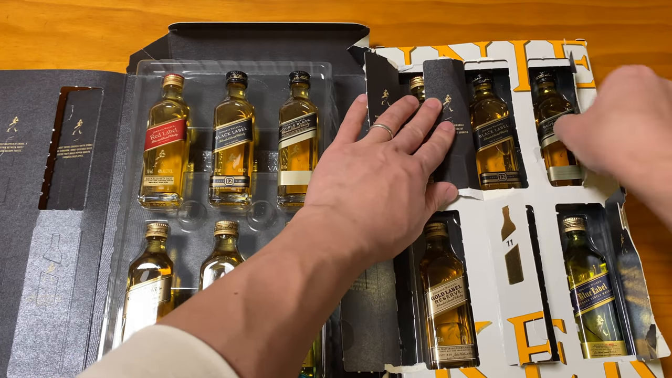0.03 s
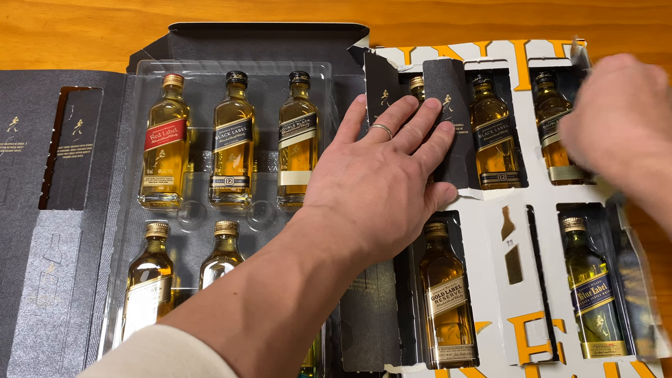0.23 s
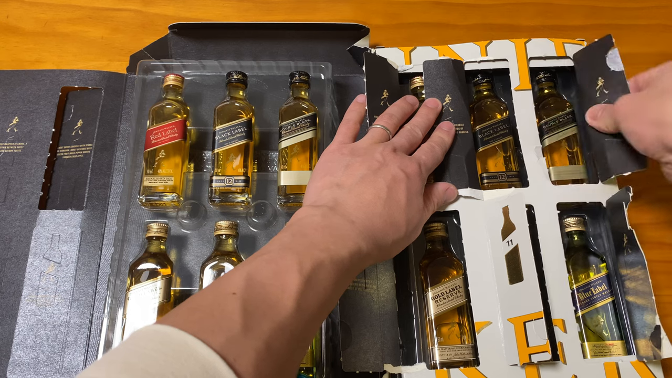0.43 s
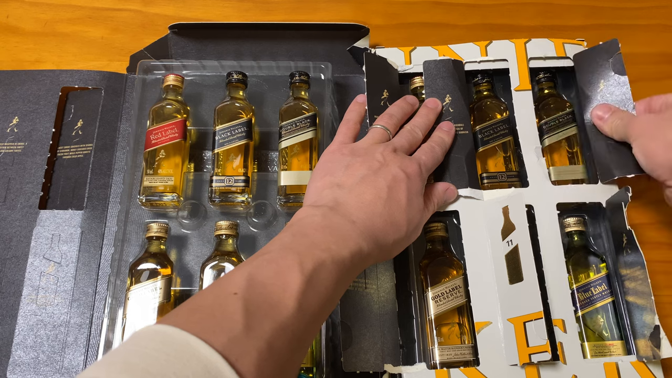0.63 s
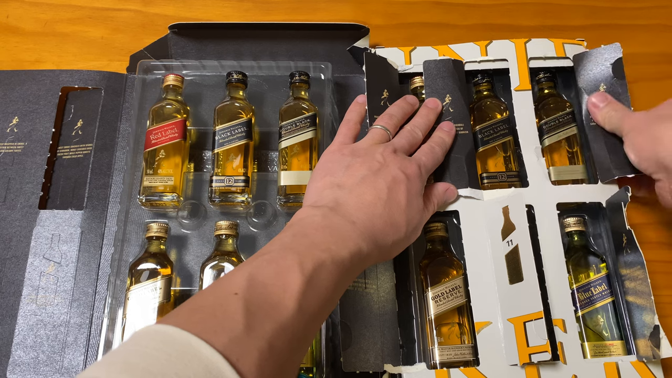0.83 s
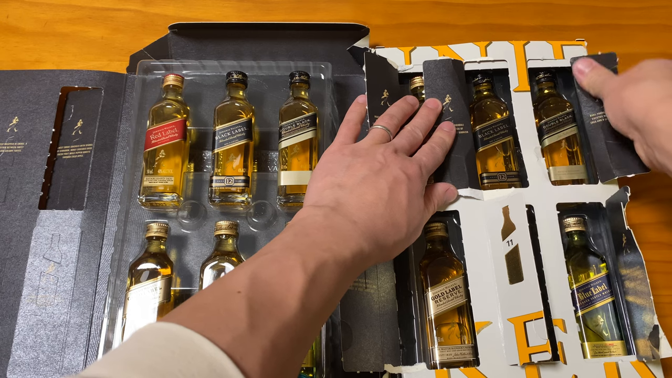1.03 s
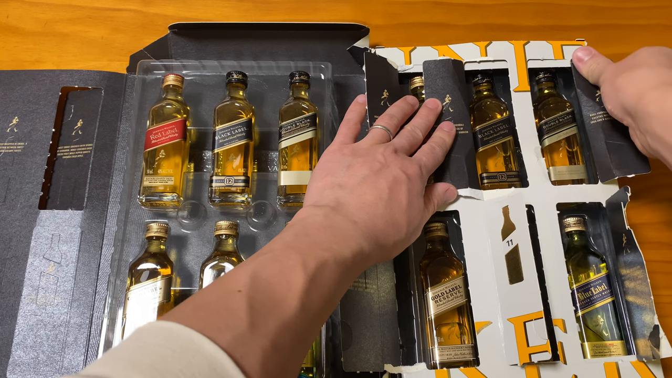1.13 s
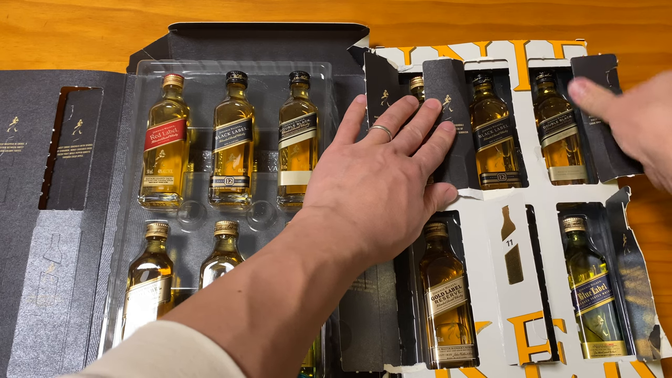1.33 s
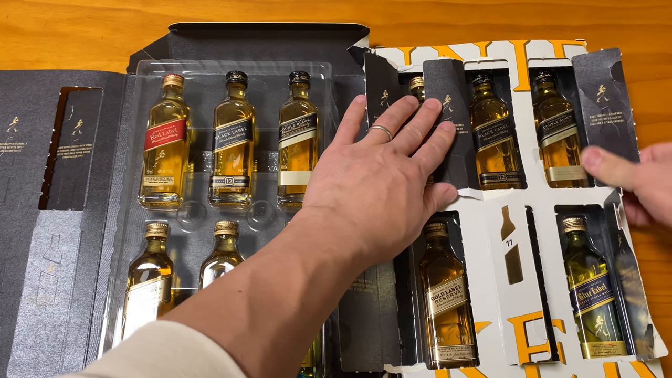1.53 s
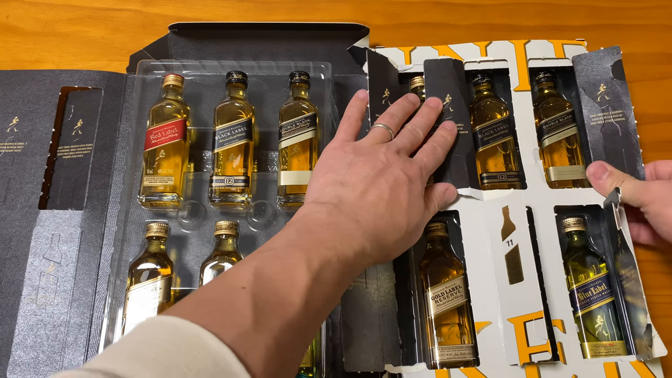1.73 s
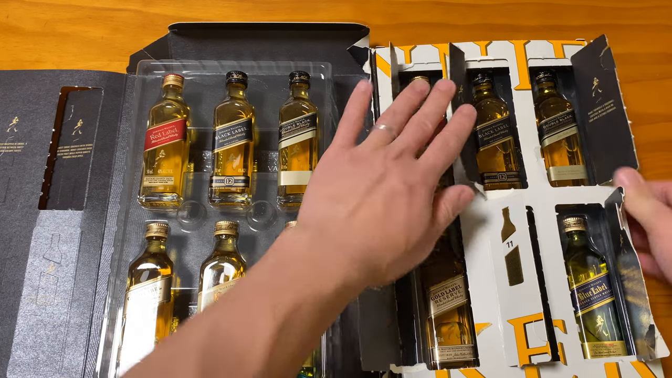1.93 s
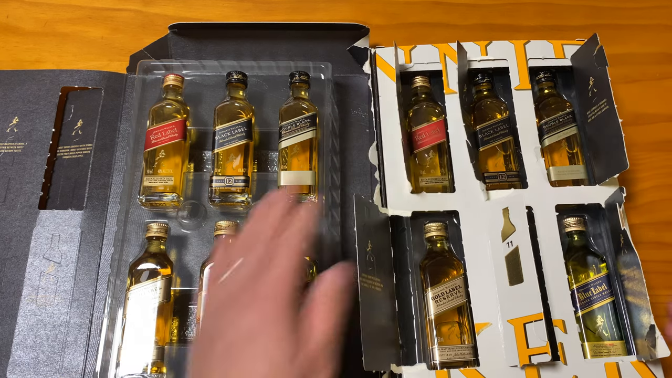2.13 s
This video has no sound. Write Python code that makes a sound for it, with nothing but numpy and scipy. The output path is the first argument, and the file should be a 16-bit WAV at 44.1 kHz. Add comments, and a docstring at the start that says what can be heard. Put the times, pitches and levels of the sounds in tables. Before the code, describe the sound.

Close-up cardboard tearing in a small room: brief rustle, a hard bright crack, a quiet gap, then soft creasing knocks, grainy finger sliding and a quick crackle before the hands let go, over faint low room air.

```python
"""A perforated cardboard flap, torn open by hand and folded back on a table in a small room, heard by two
microphones. The last paper bridge snaps: a crack through the air and a bending wave through the board.
The crease pops with dispersed clicks, fibres tick and crackle in coloured bursts, and a thumb slides
along the fold with a dry, grainy hiss. The box rings briefly; behind it lie the board shifting under the
hands, the decaying answer of the room and its still air, all in filtered noise."""
import sys
import numpy as np
from scipy import signal
from scipy.fft import rfft, irfft
from scipy.io import wavfile
from scipy.ndimage import uniform_filter1d

SR = 44100
rng = np.random.default_rng(int(sys.argv[2]) if len(sys.argv) > 2 else 0)


def generate_wav(signal):
    """Clip the signal to [-1, 1] and save it as 16-bit WAV at the path in sys.argv[1]."""
    frames = np.transpose(np.atleast_2d(signal))
    scaled = np.clip(frames, -1, 1) * 32767
    pcm = np.round(scaled).astype(np.int16)
    wavfile.write(sys.argv[1], SR, pcm)


N = 97020  # samples
HZ, T = np.fft.rfftfreq(N, 1 / SR), np.arange(N) / SR


def amp(db):
    """Decibels to gain."""
    return 10 ** (np.asarray(db) / 20)


def unit(x):
    """Scales to rms 1."""
    return x / np.sqrt(np.mean(x ** 2) + 1e-20)


def read(points, hz=HZ):
    """Reads a table on a log-frequency axis."""
    f, value = np.transpose(points)
    return np.interp(np.log(hz + 1), np.log(f + 1), value)


def level(points):
    """Gain over time from a dB curve."""
    return amp(np.interp(T, *np.transpose(points)))


def convolve(x, response):
    """Plays a mono sound through a response per channel."""
    return signal.fftconvolve(x[None], np.atleast_2d(response), axes=1)[:, :N]


def causal(gain):
    """Gives a colour the phase of a real resonator, so that nothing rings before the blow."""
    cepstrum = irfft(np.log(gain + 1e-5), N)
    fold = np.r_[1, np.full(N // 2 - 1, 2), 1, np.zeros(N // 2 - 1)]
    return np.exp(rfft(cepstrum * fold))


def bend(start, peak_db, gain, lag_s):
    """A click spread into a falling chirp: bending waves travel as the root of frequency."""
    # lag_s is how far 1 kHz trails the high-frequency limit; 0 leaves the click whole
    turns = HZ * start + 2 * lag_s * np.sqrt(1000 * HZ)
    wave = irfft(gain * np.exp(-2j * np.pi * turns), N)
    return amp(peak_db) * wave / abs(signal.hilbert(wave)).max()


# likeness of diffuse sound at the two microphones: (frequency [Hz], correlation [0-1])
MICROPHONE_LIKENESS = [(60, 0.96), (150, 0.95), (300, 0.74), (650, 0.46), (1400, 0.51), (4000, 0.043)]


def diffuse(gain=1):
    """Coloured stereo noise of rms 1, alike in the bass and nearly unrelated in the treble."""
    a, b = rfft(rng.standard_normal((2, N)))
    same = read(MICROPHONE_LIKENESS)
    other = same * a + np.sqrt(1 - same ** 2) * b
    return unit(irfft(np.array([a, other]) * gain, N))


# colour of the still air in the room: (frequency [Hz], relative level per Hz [dB])
AIR_COLOUR = [(20, -19), (35, -7.5), (48, 4.5), (75, -3), (105, -8), (138, 3.5), (220, -7), (350, -5),
              (680, -20.5), (2000, -26.5), (5000, -47), (12000, -51), (16000, -64)]
AIR_DB = -59.5


def still_air():
    """The room with nothing moving: steady diffuse noise, strongest in the bass."""
    return amp(AIR_DB) * diffuse(amp(read(AIR_COLOUR)))


def tail(t60, rise_s):
    """A diffuse decay of energy 1, each band dying at its own speed."""
    hz, t, z = signal.stft(diffuse(), SR, nperseg=256)
    decay = amp(-60 * t / read(t60, hz)[:, None])
    out = signal.istft(z * decay, SR, nperseg=256)[1][:, :SR]
    out = out * (1 - np.exp(-(T[:SR] / rise_s) ** 2))
    return unit(out) / np.sqrt(SR)


# how long the small room answers: (frequency [Hz], time to fall 60 dB [s])
ROOM_DECAY = [(60, 0.3), (300, 0.49), (550, 0.3), (1100, 0.35), (5000, 0.26), (15000, 0.18)]
ROOM_DB = -14.5


def room(x):
    """The walls send the sound back as a diffuse decay, heard from all around."""
    return amp(ROOM_DB) * convolve(x, tail(ROOM_DECAY, rise_s=0.0043))


# strength of the board shifting under the hands: (time [s], level [dB])
SHIFT_LEVEL = [(0, -60), (.04, -53.5), (.12, -54.5), (.45, -58.5), (.65, -61), (1.0, -56.5), (1.18, -58),
               (1.45, -65.5), (1.66, -59), (1.83, -53), (1.92, -64), (1.97, -77), (2.03, -67.5),
               (2.12, -62.5), (2.2, -94)]
# its colour: (frequency [Hz], relative level [dB])
SHIFT_COLOUR = [(25, -40.5), (90, -6), (180, 2.5), (350, 3), (520, 2), (760, -15), (1500, -10), (3400, -14),
                (5000, -17.5), (12000, -59)]


def shifting():
    """The board moves under the hands: a low diffuse rumble that follows the level curve."""
    return level(SHIFT_LEVEL) * diffuse(amp(read(SHIFT_COLOUR)))


# fingers brushing off the card: (middle time [s], level [dB], half length [s], centre [Hz])
BRUSHES = [(1.936, -66.5, 0.014, 4000), (2.08, -68.5, 0.015, 2880)]


def brushes():
    """Soft swishes as the hands let go: short swells of band noise."""
    out = np.zeros(N)
    for s, db, length, hz in BRUSHES:
        band = 1 / (1 + (4 * np.log2((HZ + 1) / hz)) ** 2)
        swish = irfft(rfft(rng.standard_normal(N)) * band, N)
        out += amp(db) * np.exp(-((T - s) / length) ** 2) * unit(swish)
    return out


def patchy(x, patch_db):
    """The colour drifts in random patches as the contact moves."""
    z = signal.stft(x, nperseg=512)[2]
    field = uniform_filter1d(rng.standard_normal(z.shape), size=10, axis=1)  # along time
    field = uniform_filter1d(field, size=6, axis=0)  # along frequency
    return signal.istft(z * amp(patch_db * unit(field)), nperseg=512)[1][:N]


# strength of the thumb sliding on the card: (time [s], level [dB])
RUB_LEVEL = [(0, -53), (.04, -54.5), (.085, -60.5), (.125, -89), (.15, -65), (.40, -71), (.53, -65),
             (.68, -66.5), (.85, -59.5), (.98, -55.5), (1.09, -55.5), (1.18, -78), (1.205, -54.5),
             (1.37, -49.5), (1.59, -55.5), (1.65, -75), (1.71, -70), (1.745, -48), (1.775, -62.5),
             (1.80, -53.5), (1.85, -59), (1.895, -67.5), (1.96, -70.5), (2.03, -77.5)]
# its colour: (frequency [Hz], relative level [dB])
RUB_COLOUR = [(100, -21), (380, 2.5), (800, -5), (1350, 4), (2400, -1.5), (5200, 2), (11000, -2.5),
              (16000, -12.5)]
GRAINS_PER_S, GRAIN_SPREAD_DB, GRAIN_SHARE = 2700, 6, 0.37  # share of the power
RUB_PATCH_DB = 1  # rms swing


def rub():
    """Skin slides over card: fine hiss with tiny catches."""
    hiss, sign = rng.standard_normal((2, N))
    size = amp(GRAIN_SPREAD_DB * np.minimum(rng.exponential(1, N), 3))
    grains = sign * size * (rng.random(N) < GRAINS_PER_S / SR)
    mix = np.sqrt(1 - GRAIN_SHARE) * hiss + np.sqrt(GRAIN_SHARE) * unit(grains)
    drive = patchy(mix, RUB_PATCH_DB)
    return level(RUB_LEVEL) * unit(irfft(rfft(drive) * amp(read(RUB_COLOUR)), N))


# runs of tearing fibres: (middle time [s], level [dB], half length [s])
CRACKLE_RUNS = [(0.724, -56.5, 0.009), (1.747, -46.5, 0.011)]
CRACKLE_HZ, CRACKLE_OCTAVES, CRACKLE_PER_S = 1640, 0.75, 770
CATCH_DB, CATCHES_PER_S = -8.5, 450  # dB relative to the rub


def crackle():
    """Fibres give way in quick irregular runs, and others catch under the sliding thumb."""
    size, draw = rng.standard_normal(N), rng.random(N)
    band = causal(1 / (1 + (np.log2((HZ + 1) / CRACKLE_HZ) / CRACKLE_OCTAVES) ** 2))
    runs = sum(amp(db) * np.exp(-((T - s) / length) ** 2) for s, db, length in CRACKLE_RUNS)
    tears = unit(np.sign(size) * (draw < CRACKLE_PER_S / SR))
    catches = unit(size * (draw > 1 - CATCHES_PER_S / SR))
    drive = runs * tears + amp(CATCH_DB) * level(RUB_LEVEL) * catches
    return irfft(rfft(drive) * band / np.sqrt(np.mean(abs(band) ** 2)), N)


RATTLE_S = 0.0016  # time constant


def ragged(rattle_db):
    """Spectrum of a break in which the torn fibres rattle for a moment."""
    burst = rng.standard_normal(512) * np.exp(-T[:512] / RATTLE_S)
    return 1 + amp(rattle_db) * rfft(burst / np.linalg.norm(burst), N)


# fibres that crack: (time [s], peak level before the rattle [dB], centre [Hz], width [octaves])
FIBRE_TICKS = [(0.1601, -28.5, 3900, 1.07), (0.192, -35, 1470, .35), (0.216, -33.5, 5900, 2.4),
               (0.8363, -33.5, 2860, 0.77), (0.9818, -35.5, 4300, 1.1), (1.0254, -36, 4800, .9),
               (1.1886, -40, 1500, 1.2), (1.2599, -26, 1940, 1.1), (1.319, -27.5, 2610, 1.4),
               (1.386, -34, 2800, 1.3), (1.674, -39, 1950, 1.2), (1.6870, -38, 9100, 1.1),
               (1.7080, -27.5, 1740, 1.1), (1.7240, -27.5, 2170, 1.2), (1.7454, -27.5, 1850, 1.7),
               (1.7547, -28, 2900, 1.7)]
TICK_LAG_S, TICK_EDGE_DB, TICK_RATTLE_DB = .001, -24, 3


def ticks():
    """Single fibres crack along the fold, each a band of colour with a faint sharp edge."""
    out = np.zeros(N)
    for s, db, hz, width in FIBRE_TICKS:
        band = 1 / (1 + (np.log2((HZ + 1) / hz) / width) ** 2) ** 2 + amp(TICK_EDGE_DB)
        clean = bend(s, db, band, TICK_LAG_S)
        rattling = irfft(rfft(clean) * ragged(TICK_RATTLE_DB), N)
        out += np.std(clean) * unit(rattling)  # the rattle keeps the energy
    return out


# dull pops of the crease: (time [s], peak level [dB], upper edge [Hz])
CREASE_POPS = [(0.159, -40, 795), (0.346, -44.5, 1170), (0.53, -49, 490), (0.9055, -28.5, 1490),
               (0.912, -31.5, 484), (0.980, -41, 1120), (0.991, -45.5, 910), (1.075, -39, 2040),
               (1.3056, -27.5, 1780), (1.3146, -27.5, 874), (1.401, -38.5, 625), (1.789, -38.5, 860),
               (1.948, -49.5, 220)]
# their colour: (frequency [Hz], relative level [dB])
POP_COLOUR = [(40, -48), (120, -21.5), (200, 2), (550, 5), (850, -3), (1300, 5.5), (4000, 3)]
POP_LAG_S, EDGE_LAG_S, EDGE_DB = 0.002728, .0068, -6.5


def pops():
    """The crease buckles with dull knocks; each wave comes back once from the far edge, more spread."""
    out = np.zeros(N)
    for s, db, hz in CREASE_POPS:
        colour = amp(read(POP_COLOUR)) / np.sqrt(1 + (HZ / hz) ** 14)
        out += bend(s, db, colour, POP_LAG_S)
        out += bend(s, db + EDGE_DB, colour, EDGE_LAG_S)
    return out


# the bridge that snaps, through the board: (time [s], peak level [dB])
BOARD_SNAP = (0.2258, -11.5)
# its colour: (frequency [Hz], relative level [dB])
BOARD_SNAP_COLOUR = [(25, -44), (62, -12.5), (115, -8.5), (170, -26), (255, -4), (490, 5), (660, -6.5),
                     (880, -17), (1120, -6), (1700, -14.5), (2150, -9), (2650, -18.5), (3700, -11),
                     (4900, -22), (7000, -25.5), (16000, -57)]
# the same break straight through the air: (time [s], peak level [dB])
AIR_CRACK = (0.2277, -10)
# its colour: (frequency [Hz], relative level [dB])
AIR_CRACK_COLOUR = [(700, -32.5), (1500, -15.5), (3700, -5.5), (5200, -12.5), (6700, -4.5), (8200, -16.5),
                    (11000, -14.5), (16000, -27)]
SNAP_LAG_S, CRACK_RATTLE_DB = .0042, 1


def snap():
    """The last bridge breaks: an undispersed crack through the air and a bending wave through the board."""
    crack_colour = ragged(CRACK_RATTLE_DB) * causal(amp(read(AIR_CRACK_COLOUR)))
    crack = bend(*AIR_CRACK, crack_colour, 0)
    wave = bend(*BOARD_SNAP, causal(amp(read(BOARD_SNAP_COLOUR))), SNAP_LAG_S)
    return crack + wave


# ringing of the box: (frequency [Hz], relative level [dB], time to fall 60 dB [s])
BOX_MODES = [(109.2, -26.5, 0.64), (274.3, -17, 0.22), (328.6, -18.5, 0.22), (439, -20.5, 0.22),
             (503, -15, 0.1), (644, -9.5, 0.18), (757.5, -10, 0.15)]
BOX_DB = -41.5  # added to every mode


def box(x):
    """The board's own sound and the ringing modes of the box."""
    t = T[:SR]
    ring = sum(amp(BOX_DB + db - 60 * t / t60) * np.cos(2 * np.pi * hz * t) for hz, db, t60 in BOX_MODES)
    return x + convolve(x, ring)[0]


SCATTER_T60 = 0.091  # s, in every band
BLOW_SCATTER_DB, TICK_SCATTER_DB, RUB_SCATTER_DB = -6, -7, -0.5


def scatter(blows, cracks, slide):
    """Sound scattered in the box reaches both microphones as a short diffuse decay."""
    feed = amp(BLOW_SCATTER_DB) * blows + amp(TICK_SCATTER_DB) * cracks + amp(RUB_SCATTER_DB) * slide
    return convolve(feed, tail([(1000, SCATTER_T60)], rise_s=0.003))


def ports(x, lead_s):
    """A near sound reaches the right microphone first."""
    return np.array([irfft(rfft(x) * np.exp(-2j * np.pi * HZ * lead_s), N), x])


# balance of the two microphones for near sound: (frequency [Hz], left minus right [dB])
MICROPHONE_BALANCE = [(120, 2), (340, -4.5), (700, -2.5), (1400, -1), (2200, 2.5), (4800, 3.5), (6200, 0.5)]


def balance(near):
    """Each microphone takes half of the level difference, band by band."""
    return irfft(rfft(near) * amp(np.outer([.5, -.5], read(MICROPHONE_BALANCE))), N)


RUB_LEAD_S, HIT_LEAD_S = 0.00007, .00001


def scene():
    """The flap close to the microphones, with scatter in the box, the room and its still air."""
    blows, cracks, slide = snap() + pops(), ticks() + crackle(), rub() + brushes()
    near = ports(box(blows + cracks), HIT_LEAD_S) + ports(slide, RUB_LEAD_S)
    near = near + scatter(blows, cracks, slide) + shifting()
    return balance(near) + room(blows + cracks + slide) + still_air()


SHARED_HZ, SHARED_LAG_S, CUTOFF_HZ = 6000, .000225, 15950


def record(dry):
    """The right microphone's top treble feeds both sides, late and inverted on the left; then a band limit."""
    left, right = rfft(dry)
    shared = 1 / (1 + (SHARED_HZ / (HZ + 1)) ** 30)  # share of the left side's power
    late = right * np.exp(-2j * np.pi * HZ * SHARED_LAG_S)
    left = np.sqrt(1 - shared) * left - np.sqrt(shared) * late
    lowpass = signal.firwin(511, CUTOFF_HZ, window=("kaiser", 9), fs=SR)
    return signal.oaconvolve(irfft(np.array([left, right]), N), lowpass[None], "same")


dry = scene()
out = record(dry)
generate_wav(out)
```